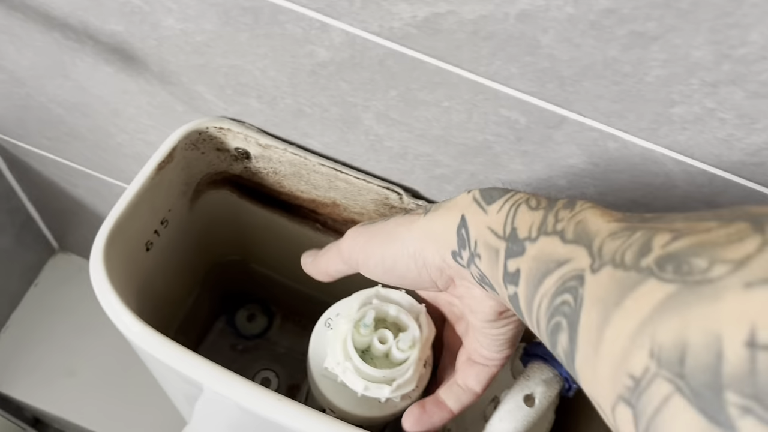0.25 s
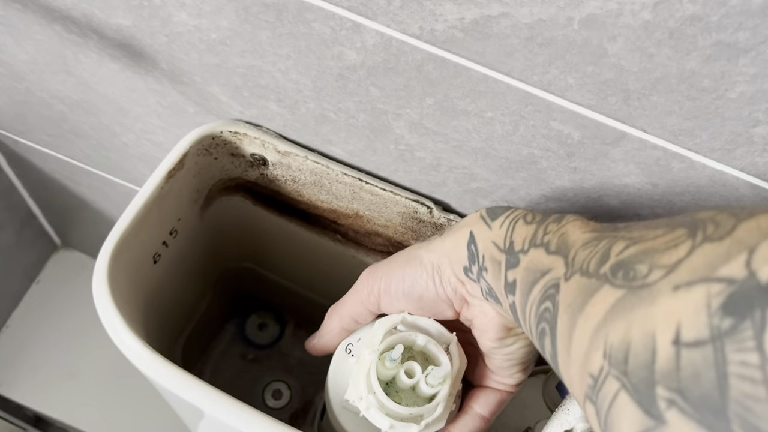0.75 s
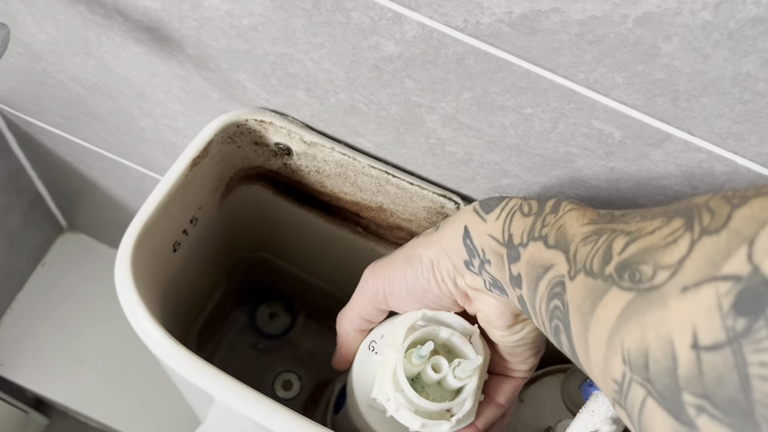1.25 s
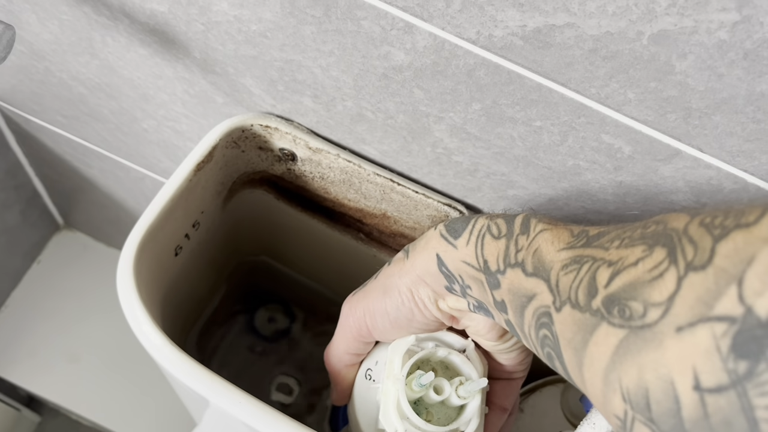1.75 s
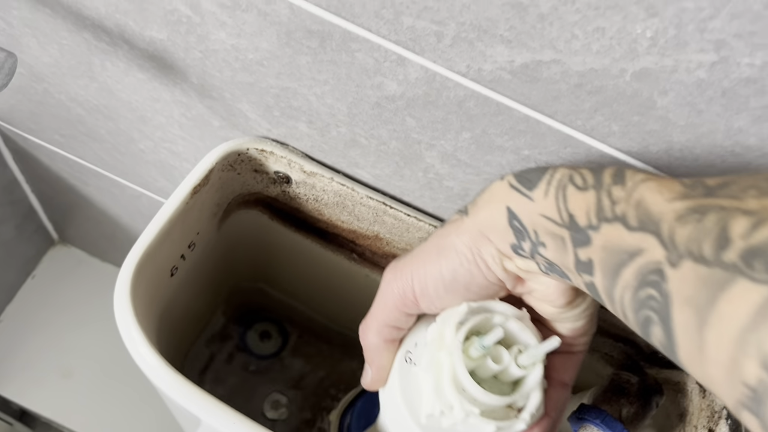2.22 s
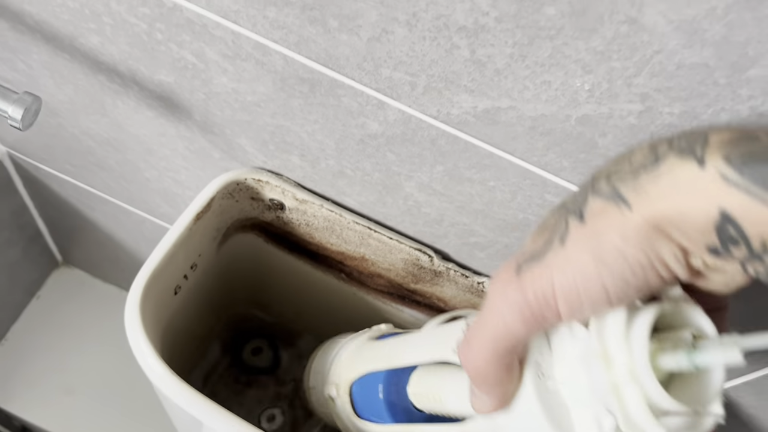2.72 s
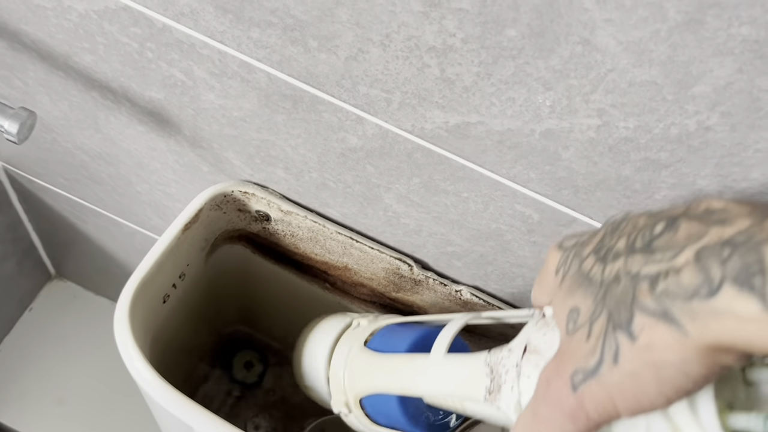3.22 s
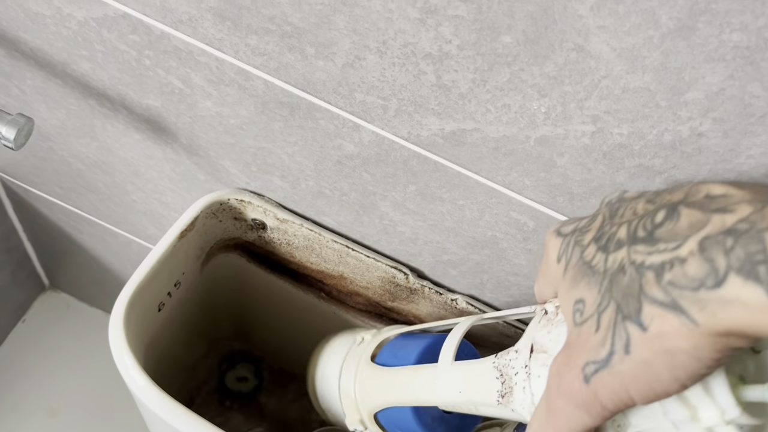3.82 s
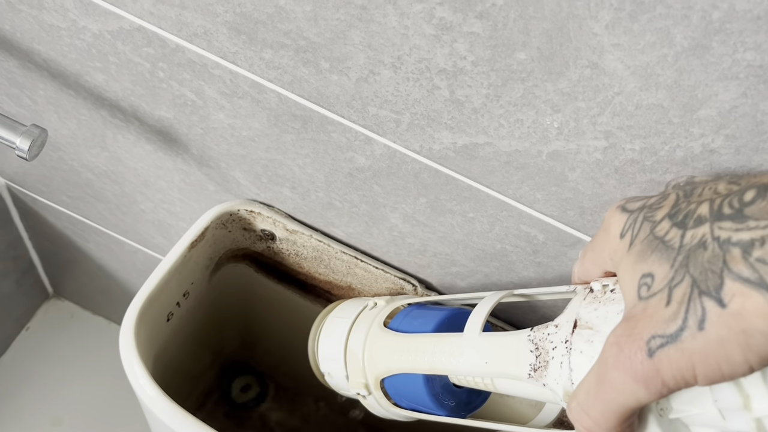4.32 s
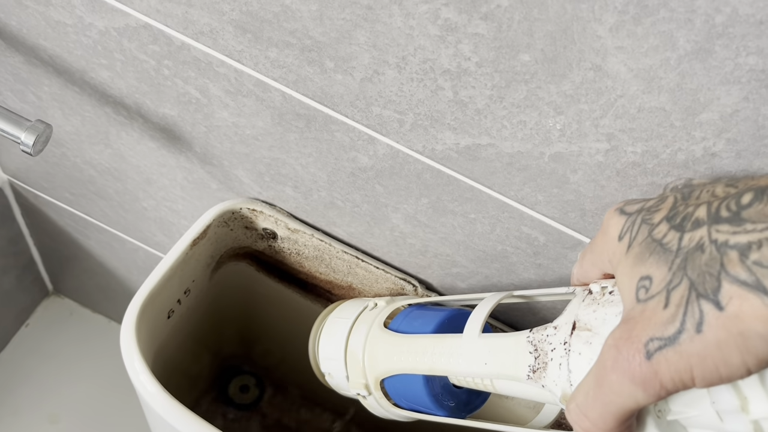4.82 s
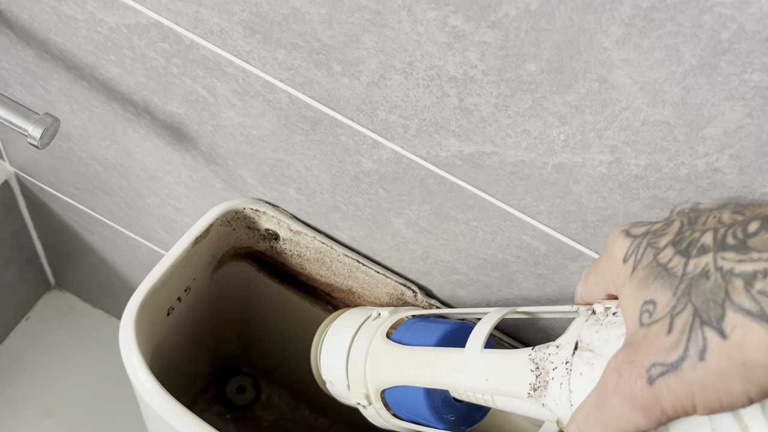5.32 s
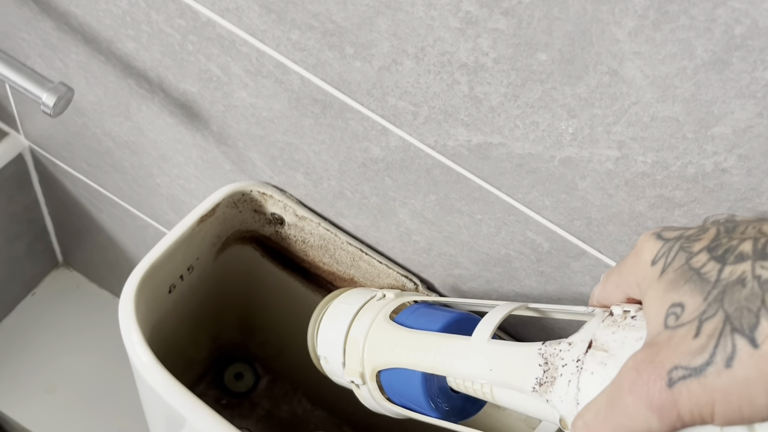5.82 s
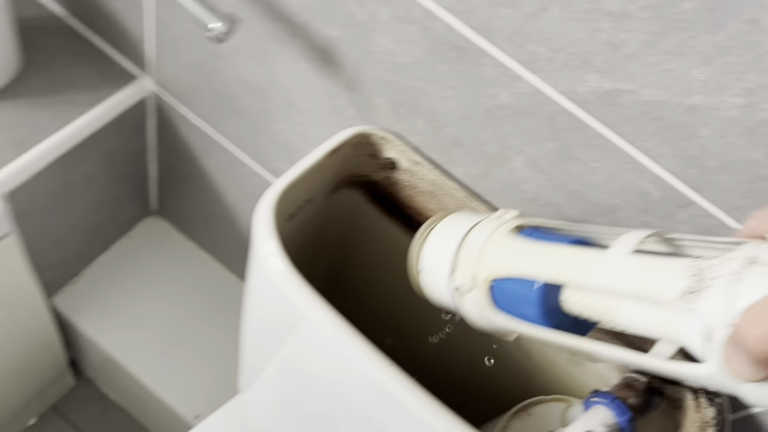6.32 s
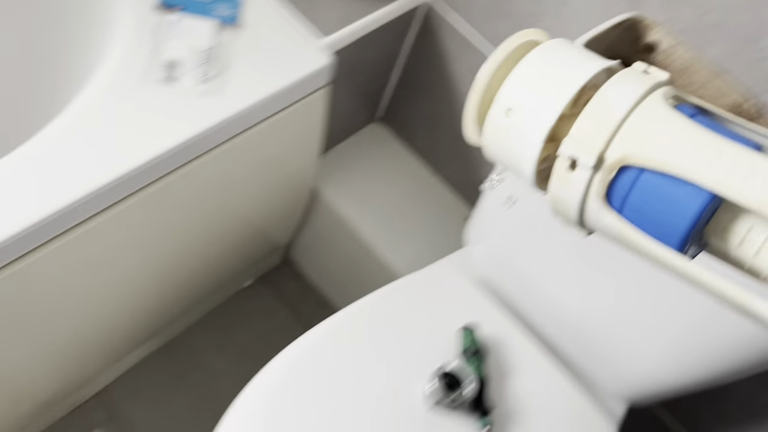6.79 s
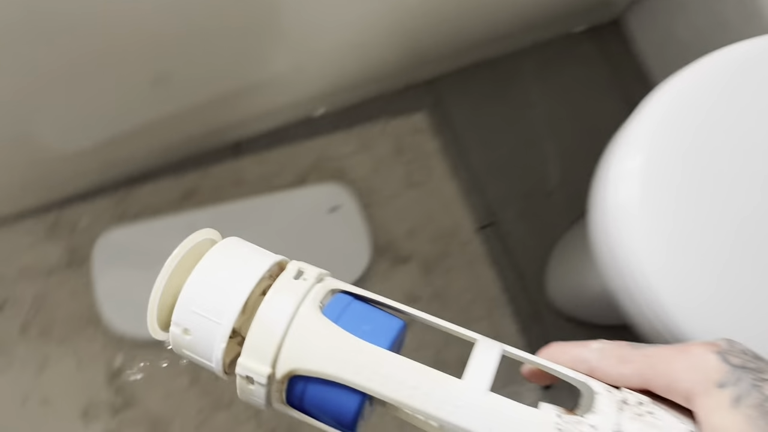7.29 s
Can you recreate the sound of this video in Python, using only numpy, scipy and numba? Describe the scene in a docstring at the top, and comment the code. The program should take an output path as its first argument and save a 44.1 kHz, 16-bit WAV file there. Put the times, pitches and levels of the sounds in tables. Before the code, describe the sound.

A hand rubs a plastic valve, then it clacks loose with a hollow thud and water gulps, rushes away and dwindles to drips in a tiled bathroom.

```python
"""In a small tiled bathroom, a hand twists the flush valve out of an open ceramic cistern under a held phone.
Skin and cloth rub as filtered noise; the valve clacks and rattles as bursts of tiny contacts ring its modes.
The last water gulps as fading sines and rushes away as swarms of bubbles and noise, dwindling to a trickle.
The outlet pipe hums as narrow noise, and drops from the valve make a smack, a bubble note and a splatter.
Noise echoes answer from the walls; the phone's two microphone ports differ in level and phase."""
import sys
import numpy as np
from scipy import signal
from scipy.fft import rfft, irfft, next_fast_len
from scipy.io import wavfile
from scipy.ndimage import uniform_filter1d
from numba import njit

SR = 44100
rng = np.random.default_rng(int(sys.argv[2]) if len(sys.argv) > 2 else 0)


def transcribe(signal):
    """Save signal, clipped to [-1, 1], as a 16-bit WAV file at the path in sys.argv[1]."""
    frames = np.atleast_2d(signal).T
    limited = np.clip(frames, -1, 1)
    pcm = np.round(limited * 32767).astype(np.int16)
    wavfile.write(sys.argv[1], SR, pcm)


N = 332955

# water leaving the cistern, before random wavering: [t/s, level/dB]
WATER_FLOW = [(1.93, -71), (2.02, -51), (2.08, -39.5), (2.42, -42), (2.56, -46.5), (2.7, -44.5),
              (2.96, -35.5), (3.4, -33.5), (3.57, -33), (3.73, -29.5), (3.9, -40), (4.56, -38.5),
              (4.81, -45.5), (5.0, -44), (5.5, -49), (5.65, -57), (6.2, -58.5), (6.45, -72.5), (6.7, -61),
              (7.0, -66), (7.3, -62), (7.55, -60)]
# tone colour of fine spray, also used for rubbing: [f/Hz, gain/dB]
SPRAY_COLOUR = [(300, -33), (1500, 0.5), (3000, -10.5), (5500, -11), (7000, -10.5), (10000, -16),
                (14000, -10), (17000, -29.5)]


def undb(db):
    """Turn decibels into a plain gain."""
    return 10 ** (np.asarray(db) / 20)


def level(x, db):
    """Scale a sound to an rms level in dB."""
    return x * undb(db) / np.sqrt(np.mean(x ** 2))


def track(table, outside=-120):
    """Draw each table column as a line over all samples, with a fixed value outside the table's times."""
    s, *columns = np.transpose(table)
    t = np.arange(N) / SR
    return [np.interp(t, s, column, left=outside, right=outside) for column in columns]


def coloured(x, points):
    """Change the tone by gains in dB, joined by straight lines over log frequency."""
    hz, db = np.transpose(points)
    size = next_fast_len(N)
    f = np.maximum(np.fft.rfftfreq(size, 1 / SR), 1)
    gain = undb(np.interp(np.log(f), np.log(hz), db))
    return irfft(rfft(x, size) * gain, size)[..., :N]


@njit
def svf(x, hz, width):
    """Let through a band around a centre that may move; the gain at the centre is 1."""
    y, b, l = np.empty(len(x)), 0., 0.
    for i in range(len(x)):
        g, k = np.tan(np.pi * hz[i] / SR), width / hz[i]
        v = (b + g * (x[i] - l)) / (1 + g * (g + k))
        b, l, y[i] = 2 * v - b, l + 2 * g * v, k * v
    return y


def band(x, hz, width):
    """Let through a band around a fixed centre."""
    return svf(x, np.full(len(x), min(1. * hz, .45 * SR)), max(1. * width, 5.))


def twice(x, hz, width):
    """Apply the same band filter twice, for steeper sides."""
    return band(band(x, hz, width), hz, width)


def walk(rate):
    """Make a smooth random wander around zero that heads somewhere new about rate times per second."""
    k = int(SR / rate)
    steps = np.repeat(rng.standard_normal(N // k + 1), k)
    return 0.99 * uniform_filter1d(uniform_filter1d(steps, k), k)[:N]


def add(out, s, sound, peak_db, pan_db):
    """Lay a sound into the stereo track at a peak level; pan_db is left minus right."""
    i = int(s * SR)
    n = min(len(sound), N - i)
    sides_db = peak_db + np.array([[pan_db], [-pan_db]]) / 2
    out[:, i:i + n] += sound[:n] / np.abs(sound).max() * undb(sides_db)


def ring(t, hz, t60_s, rise_s, glide):
    """Swell a sine to its crest, then let it fade while its pitch slides by the share glide."""
    since = t - rise_s
    bend = since + glide * (t - t60_s / 4 * (1 - np.exp(-4 * t / t60_s)))
    swell = np.sin(np.pi / 2 * np.minimum(t / rise_s, 1)) ** 2
    fade = 1000 ** (-np.maximum(since, 0) / t60_s)
    return np.cos(2 * np.pi * hz * bend) * swell * fade


def strokes(table, attack_s, sag_db_s, fade_db_s):
    """Gain of movements that each swell, change slowly while they last and then fade."""
    t = np.arange(N) / SR
    gain = 0
    for s, db, length_s in table:
        sag_db = sag_db_s * np.maximum(t - s, 0)
        fade_db = fade_db_s * np.maximum(t - s - attack_s - length_s, 0)
        # a stroke at time 0 is already under way
        swell = np.clip((t - s) / attack_s + (s == 0), 0, 1) ** 2
        gain = gain + undb(db - sag_db - fade_db) * swell
    return gain


def rubbing():
    """Skin and cloth rub on the plastic as coloured noise; a narrow moving band of it is the skin's squeak."""
    # hand and sleeve rubbing: [t/s, level/dB, length/s]
    rubs = [(0, -69, 0.17), (.17, -65, 0.21), (.315, -56.5, 0.39), (.995, -71.5, 0.042)]
    # bands that stand out in the rubbing: [f/Hz, width/Hz, gain/dB]
    rub_rings = [(330, 75, 16), (1620, 54, -5), (7100, 2700, -10)]
    # skin squeaking on the plastic, before wavering: [t/s, level/dB, length/s]
    squeaks = [(.325, -67.5, 0.12), (.48, -74, 0.1), (.6, -87, 0.085)]
    shape = dict(attack_s=0.031, sag_db_s=44.5, fade_db_s=246)
    noise = rng.standard_normal(N)
    rub = coloured(noise, SPRAY_COLOUR) + sum(undb(db) * band(noise, hz, w) for hz, w, db in rub_rings)
    squeak_hz = 2660 * (1 + 0.013 * walk(19))
    squeak = level(svf(noise, squeak_hz, 130.0), 0) * undb(2.6 * walk(40.2))
    return level(rub, 0) * strokes(rubs, **shape) + squeak * strokes(squeaks, **shape)


def rumble():
    """Moving air, hand movement and the drain are deep noise that reaches both ports alike."""
    # air and hand movement at the phone: [t/s, level/dB, length/s]
    thumps = [(0, -63.5, 0.15), (.2, -61.5, 0.23), (.86, -67, 0.071), (1.57, -38.5, 0.051),
              (1.94, -38.5, 0.18), (2.08, -40, 0.045), (2.62, -32.5, 0.06), (2.89, -50, 0.024),
              (3.74, -57, 0.016), (5.65, -57, 0.61), (6.3, -52.5, 0.35), (6.71, -43.5, 0.027),
              (6.855, -35.5, 0.01), (6.91, -45, 0.012), (7.1, -53.5, 0.58), (7.44, -53, .1)]
    deep = band(twice(rng.standard_normal(N), 53, 170.0), 58, 200.0)
    # the drain follows the rush 13 dB below it, and wavers
    drain = undb(track(WATER_FLOW)[0] - 13 + 3 * walk(6.8))
    # the negative sag lets a thump grow slightly while it lasts
    movement = strokes(thumps, attack_s=0.033, sag_db_s=-1.5, fade_db_s=122.5)
    return level(deep, 0) * (movement + drain)


def still_room():
    """The quiet room is steady coloured noise."""
    # tone colour of the quiet: [f/Hz, gain/dB]
    quiet_colour = [(35, -32.5), (60, -6.5), (96, 1.5), (566, -12), (862, -11.5), (946, -10.5), (3580, -30),
                    (16000, -29.5)]
    return level(coloured(rng.standard_normal(N), quiet_colour), -74.5)


def gulps():
    """Gulps of air and a few soft thumps ring as low fading sines, often with a sliding pitch."""
    # gulps and soft thumps, glide below zero falls: [t/s, peak level/dB, f/Hz, rise/ms, glide/share of f]
    gulp_list = [(0.363, -48, 314, 12.6, 0.05), (1.975, -35, 298.5, 8.1, 0.05), (2.02, -29, 425, 17, 0.03),
                 (2.074, -31.5, 292, 18, 0.12), (2.12, -6, 212.8, 13.6, -0.012),
                 (2.17, -35, 790, 12, -0.0025), (2.33, -30.5, 560, 18, .25),
                 (2.318, -23, 309.3, 10, 0.0041), (2.365, -14, 184, 5.1, 0.18), (2.366, -12.5, 683, 4, 0.2),
                 (2.626, -27, 216.6, 8.5, 0.049), (2.65, -30.5, 95, 15.9, -0.02),
                 (2.674, -28.5, 470, 11, -0.021), (2.707, -24, 208.2, 7.3, -0.029),
                 (2.879, -32.5, 98.8, 18.7, -0.032), (3.053, -35, 211, 6.5, 0.0014),
                 (3.389, -19.5, 209, 15.5, 0.036), (3.698, -30.5, 243, 12, 0.13),
                 (4.369, -35.5, 199.6, 31.7, 0.049), (4.667, -37.5, 207, 23.4, -0.013),
                 (5.146, -29.5, 214.4, 3.7, 0.047), (5.211, -39.5, 413, 8, 0.044),
                 (5.25, -41, 421, 14, 0.04), (5.344, -29.5, 214.8, 8.7, -0.052),
                 (5.455, -32, 225, 5.4, 0.13), (5.675, -36.5, 227, 4.9, 0.15),
                 (5.677, -39, 421, 6.5, 0.085), (5.69, -45.5, 140.6, 7.3, 0.049),
                 (5.736, -50, 420, 8, 0.14), (5.78, -46, 312, 8.4, 0.061), (5.875, -43.5, 320, 8, 0.14),
                 (5.91, -51, 450, 8, 0.18), (6.006, -33, 333, 2.85, -0.084),
                 (6.031, -39.5, 424, 7.4, -0.048), (6.051, -30, 327, 6, -0.031),
                 (6.092, -21.5, 223, 21.9, 0.156), (6.086, -32.5, 416, 8, 0.16),
                 (6.151, -46, 431, 8, -0.093), (6.15, -37, 248, 34, -0.0017),
                 (6.109, -40.5, 149.4, 21.4, -0.024), (6.205, -45, 412, 8, 0.07),
                 (6.335, -51, 515, 12, 0.081), (6.385, -54, 600, 8, .12), (6.43, -49, 650, 6, .05),
                 (6.54, -51, 400, 6.6, 0.12), (6.439, -26.5, 231, 22, 0.086),
                 (6.499, -38.5, 252, 23, 0.014), (6.523, -45, 155.3, 62, -0.0073),
                 (6.864, -34, 90.5, 17, 0.32), (6.867, -46, 320, 4.1, 0.19), (6.945, -45, 211, 5.5, 0.031),
                 (7.413, -38.5, 286, 4, 0.27)]
    out, t = np.zeros((2, N)), np.arange(int(.9 * SR)) / SR
    for s, db, hz, ms, glide in gulp_list:
        # rising and loud ones die sooner than the basic 93 cycles to 60 dB down
        loss = 1 + 12 * max(glide, 0) + 0.5 * undb(db)
        add(out, s, ring(t, hz, 93 / hz / loss, ms / 1000, glide), db, 0)
    return out


def tank_thuds():
    """Blows on the ceramic tank ring its modes; harder blows reach more of the upper ones."""
    # thuds: [t/s, peak level/dB, rise of the main and lower modes/ms, hardness/dB per octave]
    thuds = [(1.549, -10, 6.8, -5.5), (1.58, -19, 6.3, -7), (1.603, -23, 7.2, -27), (2.124, -5.5, 9.1, -27),
             (5.358, -30, 12, -9.5)]
    # modes of the tank: [f/Hz, strength before hardness/dB, fade by 60 dB/s]
    tank = [(100.2, -25, 1), (167.9, -2.5, 0.32), (172.6, -16, 0.7), (325.5, 7.5, 0.063),
            (314, -21.5, 0.66), (640, -14, 0.14), (790, -18.5, .2)]
    out, t = np.zeros((2, N)), np.arange(int(.9 * SR)) / SR
    main_hz = tank[1][0]
    for s, db, ms, hard_db in thuds:
        modes = 0
        for hz, mode_db, t60_s in tank:
            octaves = max(np.log2(hz / main_hz), 0)
            # upper modes speak sooner
            rise_s = ms / 1000 * min(main_hz / hz, 1)
            modes = modes + undb(mode_db + hard_db * octaves) * ring(t, hz, t60_s, rise_s, 0)
        add(out, s, modes, db, 0)
    return out


def knocks():
    """A quick run of tiny contacts rings the valve's modes and one chosen note, with a crack and a thud."""
    # plastic knocks and a few splashes of water; crack and thud are rms levels beside a body near 0 dB:
    # [t/s, peak level/dB, chosen note f/Hz, crack level/dB, thud level/dB, rattle fade/ms]
    knock_list = [(0.847, -51, 3760, 6, 2, 13), (0.878, -45.5, 1050, -24, 5, 18),
                  (1.017, -59.5, 2700, 4, -14, 35), (1.16, -69, 7000, 7, -30, 6),
                  (1.238, -72, 5970, 0, -30, 6), (1.272, -46, 1620, -4, -32.5, 10),
                  (1.277, -52.5, 1160, -26.5, -13.5, 16), (1.375, -61, 1640, -27, -17.5, 5.6),
                  (1.538, -18.5, 1100, -10, -2, 8.8), (1.544, -6.5, 2740, -12, -12.5, 14),
                  (1.549, -6.5, 1534, -30, -15.5, 8.3), (1.552, -4.5, 3000, 2.5, 3, 18),
                  (1.579, -5.5, 5050, 1, -19, 4.3), (1.745, -45.5, 2347, -26, -26.5, 10),
                  (1.987, -37, 2700, -38, -15, 21), (2.019, -29, 2640, -36, -25, 7.9),
                  (2.023, -26.5, 1140, -40, -25, 15), (2.032, -18.5, 2730, -43, -20, 6.2),
                  (2.035, -31.5, 3330, -44, -9, 9.4), (2.043, -26.5, 1110, -46, -10, 32),
                  (2.124, -39, 1100, -30, -5.5, 9.5), (2.135, -27.5, 4740, -9.5, -5, 18),
                  (2.14, -29.5, 1360, -24, -9, 54), (2.27, -35, 4500, -19, -15, 32),
                  (2.283, -25.5, 2690, -5, -12, 15), (2.365, -21, 800, -19, -23, 7.5),
                  (2.373, -18.5, 2690, -14, -20, 13), (2.643, -29, 600, -24, 21, 12),
                  (2.674, -23, 3780, -18, -13, 10), (2.874, -22, 2380, -32, -18, 14),
                  (3.052, -18, 537, -1, 0, 9), (3.074, -13.5, 2800, -20, 4.5, 3.4),
                  (3.145, -18, 2720, -35, -24, 12), (3.203, -19, 2900, -37, -16, 2.9),
                  (3.228, -16, 1300, -4, -34, 21), (3.253, -7, 1460, -26, -8, 9),
                  (3.403, -13, 3370, -2.5, -42, 36), (3.432, -7.5, 2590, -13, -2.5, 5.05),
                  (3.543, -18.5, 1450, -9, -27, 6.2), (3.579, -13.5, 1810, 0.5, -28, 24),
                  (3.596, -13.5, 1340, -12, -39, 10), (3.605, -5.5, 2570, -28, -32, 7.5),
                  (3.608, -10.5, 1330, -32, -6, 3.3), (3.672, -19.5, 2410, -33, -35, 19),
                  (3.706, -15, 1430, -33, -37, 18), (3.752, -13.5, 1310, -4, -28, 12),
                  (3.779, -6, 910, -34, -30, 3.8), (3.777, -9.5, 2570, -19, -6.5, 5.3),
                  (3.839, -16, 1780, -10, -35, 8.3), (3.886, -23, 4150, -38, -28, 9.3),
                  (4.396, -28, 3770, -25, -23, 5.2), (4.426, -28, 2600, -25, -23, 3.8),
                  (4.656, -16.5, 2820, -30, -11, 3.7), (4.793, -32, 1110, -29, -21, 4.7),
                  (5.582, -33.5, 1620, -1, -12, 32), (5.686, -35.5, 1350, -1, -1, 6.1),
                  (6.023, -35, 1320, -21, -22, 11), (7.05, -45, 4200, -4, -27, 31),
                  (7.285, -46, 5250, -7, -22, 18)]
    # modes of the valve, before random change: [f/Hz, width/Hz, strength/dB]
    valve = [(870, 200, 0), (1110, 110, 2.5), (1390, 190, -3), (1640, 75, 5), (2137, 180, -6.5),
             (2730, 120, -6.5), (3155, 110, -4), (3390, 110, -5.5), (3730, 200, -11.5), (4800, 710, -3.5),
             (7700, 600, -32.5)]
    # each knock starts this long before its listed time; random left-right difference
    lead_s, spread_db = 0.0022, 3.5
    out, t = np.zeros((2, N)), np.arange(int(.1 * SR)) / SR
    for s, db, hz, crack_db, thud_db, ms in knock_list:
        chance = rng.standard_normal((2, len(t)))
        rise_ms = min(5.05, 0.77 * ms)  # short knocks are sharp
        swell = np.minimum(t * 1000 / rise_ms, 1) ** 1.9
        force = swell * np.exp(-np.maximum(t * 1000 - rise_ms, 0) / ms)
        contacts = chance[0] * np.abs(chance[1]) ** 1.14 * force
        body = 0
        for f, w, mode_db in valve:
            gain = undb(mode_db + 2.4 * rng.standard_normal()) / np.sqrt(w)
            body = body + gain * band(contacts, f, w)
        note = band(band(contacts, hz, 0.37 * hz), hz, 0.2 * hz)
        clatter = band(band(contacts, 2070, 1800.0), 2330, 1900.0)
        # the crack of first contact fades on top of the rattle's own fade
        crack = twice(contacts * np.exp(-t / 0.0031), 5800, 8000.0)
        thud = twice(contacts, 450, 490.0)
        sound = level(body, -0.079) + level(note, 0.22) + level(clatter, -2.2)
        sound = sound + level(crack, crack_db) + level(thud, thud_db)
        add(out, s - lead_s, sound, db, spread_db * rng.standard_normal())
    return out


@njit
def bubbles(start, hz, cycles, size, glide, length):
    """Each bubble is a fading sine whose pitch rises as it nears the surface."""
    out = np.zeros(length)
    for j in range(len(start)):
        tau, phase = cycles[j] * SR / hz[j], 0.
        for i in range(min(int(5 * tau), length - start[j])):
            phase += 2 * np.pi * hz[j] * (1 + glide * i / tau) / SR
            out[start[j] + i] += size[j] * np.sin(phase) * (np.exp(-i / tau) - np.exp(-8 * i / tau))
    return out


def swarm(count, lo_hz, hi_hz, cycles, scatter_db, glide=0.043):
    """Bubbles start at random moments and pitches, a few much louder than the rest."""
    when, pitch, loudness, life = rng.random((count, 4)).T
    start = (when * N).astype(np.int64)
    hz = lo_hz * (hi_hz / lo_hz) ** pitch
    size = undb(-scatter_db * np.log(1 - 0.99 * loudness))
    return level(bubbles(start, hz, cycles * (.5 + life), size, glide, N), 0)


def splashes():
    """Separate splashes over an even flow: sudden, soon gone, a few much larger."""
    hits = (rng.random(N) < 72 / SR) * rng.exponential(size=N)  # about 72 per second
    fade = np.exp(-1 / (0.0073 * SR))
    splash = signal.lfilter([1], [1, -fade], uniform_filter1d(hits, size=60))
    return level(1.5 + level(splash, -5.5), 0)


def rush():
    """Bubbles and churning noise ring the hollow air of the cistern, with plops of larger bubbles."""
    # air of the cistern, before wandering and widening: [f/Hz, width/Hz, strength/dB]
    bowl = [(577, 73, -10), (749, 72, -8.5), (1007, 59, -0.5), (1142, 110, -3), (1271, 160, -5.5),
            (1410, 145, -1.5), (1593, 100, 1.5), (1756, 14, -30.5), (2460, 330, -9), (3710, 510, -7.5)]
    # tone colour of the open rush: [f/Hz, gain/dB]
    rush_colour = [(30, -68), (150, -24), (300, -23), (450, -9), (700, -1), (1500, 10), (2200, -3.5),
                   (4000, 5.5), (16000, -30.5)]
    churn = swarm(count=9000, lo_hz=400.0, hi_hz=3400, cycles=2.63, scatter_db=1.5)
    churn = churn + 0.36 * level(band(rng.standard_normal(N), 1300, 2500.0), 0)
    hollow = 0
    for hz, w, db in bowl:
        # the air pockets change shape, so their notes wander
        pocket_hz, width_hz = hz * (1 + 0.041 * walk(12)), 1.26 * w
        pocket = svf(svf(churn, pocket_hz, width_hz), pocket_hz, width_hz)
        hollow = hollow + undb(db + 8.2 * walk(18)) * pocket
    plops = swarm(count=4200, lo_hz=560.0, hi_hz=2600, cycles=6.7, scatter_db=2.0, glide=0.045)
    return level(level(hollow, 0) + level(coloured(churn, rush_colour), -0.75) + level(plops, -4.8), 0)


def spray():
    """Fine spray is noise and tiny bubbles in uneven lumps, with brief treble flecks."""
    mist = rng.standard_normal(N)
    mist = mist + 0.41 * swarm(count=4000, lo_hz=2583, hi_hz=15570, cycles=6.2, scatter_db=3.0)
    # each pitch range has its own lumps
    centres_hz = 1000 * 2 ** np.arange(0, 4.1, .5)
    lumps = sum(undb(3.3 * walk(28)) * band(mist, hz, 0.62 * hz) for hz in centres_hz)
    # about 9 flecks per second burst close by, each with a short fizz
    flecks = (rng.random(N) < 9 / SR) * undb(2.9 * rng.standard_normal(N))
    fizz = signal.lfilter([1], [1, -np.exp(-1 / (0.0033 * SR))], flecks) * rng.standard_normal(N)
    return level(coloured(lumps, SPRAY_COLOUR), 0) + level(twice(fizz, 11300, 7000.), -11.5)


def water():
    """Rush, gurgle and spray follow the outflow; splashes shake the rush and spray, and all surge together."""
    # fine spray of the water, before wavering: [t/s, level/dB]
    spraying = [(1.93, -64.5), (2.03, -51.5), (2.25, -55.5), (2.4, -45.5), (2.6, -47.5), (2.72, -39),
                (2.85, -38.5), (3.1, -33), (3.6, -38.5), (3.95, -42), (5.3, -45), (5.7, -58.5),
                (6.2, -59.5), (6.48, -62), (6.75, -61.5), (7.02, -59), (7.28, -55), (7.55, -51)]
    # large bubbles in the water, before wavering: [t/s, level/dB]
    gurgling = [(1.93, -70.5), (2.08, -41.5), (2.5, -44.5), (2.68, -39.5), (3.5, -45.5), (4.1, -54),
                (4.9, -63), (5.3, -58.5), (5.7, -65.5), (6.08, -57), (6.4, -62), (7.05, -70), (7.55, -56)]
    (rush_db,), (spray_db,), (gurgle_db,) = track(WATER_FLOW), track(spraying), track(gurgling)
    splash = splashes()
    gurgle = swarm(count=2600, lo_hz=291.5, hi_hz=953, cycles=2.9, scatter_db=2.6, glide=0.09)
    mix = np.sqrt(splash) * rush() * undb(rush_db)
    mix = mix + gurgle * undb(gurgle_db + 2 * walk(8.4))
    mix = mix + splash * spray() * undb(spray_db + 2.3 * walk(30))
    return mix * undb(0.5 * walk(9.1))


def outlet():
    """Turbulence keeps the air column of the pipe humming: noise through a narrow moving band."""
    # air column of the outlet pipe, level before wavering: [t/s, f/Hz, level/dB]
    pipe = [(2.15, 204, -52), (2.27, 199, -30), (2.56, 202, -39.5), (2.7, 192.6, -32.5), (3.2, 222, -34),
            (3.9, 212, -44.5), (4.06, 209, -43), (4.5, 201, -49), (5.1, 213, -47.5), (5.7, 242, -53.5),
            (6.6, 242, -65), (7.55, 217, -59.5)]
    hz, db = track(pipe)
    hz = np.clip(hz, 150, 300)  # keeps a valid pitch outside the table, where the hum is silent
    hum = svf(svf(rng.standard_normal(N), hz, 43.0), hz, 43.0)
    return level(hum, 0) * undb(db + 1.3 * walk(3.9))


def drops():
    """A drop gives a wet smack, the ring of a trapped bubble, and a splatter fluttering near the same note."""
    # drops falling from the valve: [t/s, peak level/dB, bubble f/Hz, splatter length/ms]
    drop_list = [(2.544, -36, 460, 22), (2.679, -24, 578, 11), (2.708, -27, 1590, 5.5),
                 (2.739, -29, 1620, 8.6), (2.801, -25, 618, 11), (2.816, -28, 1600, 4.8),
                 (2.846, -29, 1620, 26), (2.895, -26.5, 1600, 9.3), (2.914, -34, 950, 18),
                 (2.963, -22.5, 1528, 33), (3.13, -21.5, 1424, 25), (3.333, -28, 1460, 11),
                 (3.361, -28, 1500, 11), (3.984, -27, 1430, 11.4), (4.03, -24, 1586, 37),
                 (4.104, -31.5, 723, 26), (4.105, -28, 1510, 12), (4.168, -33, 732, 18),
                 (4.174, -29.5, 2090, 35), (4.263, -29, 1554, 15), (4.342, -35.5, 1494, 53),
                 (4.471, -31, 1450, 13), (4.501, -27, 2650, 7.1), (4.642, -31.5, 1424, 9.1),
                 (4.733, -27, 1460, 8.2), (4.842, -32.5, 1620, 14), (4.966, -35, 2110, 6.7),
                 (4.98, -38, 3320, 27), (5.21, -41, 2800, 20), (5.302, -35.5, 3210, 5.4),
                 (5.051, -28.5, 1390, 13.5), (5.144, -24, 1154, 12), (5.214, -33.5, 1510, 10),
                 (5.284, -32.5, 1500, 25), (5.326, -45, 2180, 10), (5.369, -41, 1410, 68),
                 (5.415, -40, 1600, 21), (5.77, -39, 2120, 14), (5.855, -40, 1460, 9.5),
                 (5.967, -40.5, 1525, 13), (5.99, -48, 1170, 10), (6.035, -36, 1794, 9.3),
                 (6.073, -29.5, 1170, 7.3), (6.196, -47, 3480, 15), (6.225, -51, 4440, 8.5),
                 (6.226, -44.5, 1620, 17), (6.28, -49, 2870, 11), (6.551, -53, 1217, 16),
                 (6.598, -42.5, 1117, 8.7), (6.646, -49, 1600, 14), (6.652, -49, 1190, 26),
                 (6.72, -56, 1150, 22), (6.724, -51, 3400, 10), (6.728, -49, 2810, 33),
                 (6.8, -41.5, 1610, 31), (6.857, -54, 2000, 8), (7.052, -45, 560, 14),
                 (7.093, -48, 587, 14), (7.126, -45.5, 1490, 66), (7.196, -49, 1540, 20),
                 (7.199, -49, 3100, 15), (7.292, -40.5, 1244, 23), (7.296, -50, 760, 13),
                 (7.339, -38.5, 743, 12.5), (7.342, -41, 1600, 15), (7.397, -42.5, 760, 16),
                 (7.442, -43, 1620, 9.1), (7.469, -43, 634, 37), (7.514, -45, 1600, 30)]
    pan_db, spread_db = 1, 3  # drops fall left of the phone, with a random spread
    out, t = np.zeros((2, N)), np.arange(int(.15 * SR)) / SR
    for s, db, hz, ms in drop_list:
        chance = rng.standard_normal((2, len(t)))
        splash = chance[0] * np.minimum(t / 0.0032, 1) * np.exp(-t / 0.0085)
        smack = twice(splash, hz, 0.61 * hz)
        patter = chance[1] * np.minimum(t / 0.0025, 1) * np.exp(-(t * 1000 / ms) ** 3)
        flutter = svf(patter, hz * (1 + 0.41 * t), 0.04 * hz)
        # big, low bubbles ring longer
        bubble = ring(t, hz, 0.037 * np.sqrt(1000 / hz), 0.00294, 0.09)
        sound = undb(-0.5) * bubble + flutter / np.abs(flutter).max()
        sound = sound + undb(-8) * smack / np.abs(smack).max()
        add(out, s, sound, db, pan_db + spread_db * rng.standard_normal())
    return out


def bathroom(x, low):
    """Tiled walls answer with dense echoes: noise that fades band by band."""
    # echo bands, strength before evening out by pitch and fade: [f/Hz, fade by 60 dB/s, strength/dB]
    room = [(218, 0.38, -9.5), (720, 0.11, -12), (1600, 0.35, -13.5), (3700, 0.34, -9.5),
            (5900, 0.034, -13), (11400, 0.28, -1)]
    # echo that differs left to right: [f/Hz, gain/dB]
    room_wide = [(150, -26), (600, 1), (4000, 1), (8000, -0.5), (16000, -26)]
    t = np.arange(int(.6 * SR)) / SR
    answers = []
    for noise in rng.standard_normal((3, len(t))):
        echo = 0
        for hz, t60_s, db in room:
            fade = 1000 ** (-t / t60_s) / np.sqrt(hz * t60_s)
            echo = echo + undb(db) * band(noise, hz, 0.88 * hz) * fade
        answers.append(signal.fftconvolve(x, echo * np.minimum(t / 0.0013, 1))[:N])
    # two noise echoes are blended by a fast random turn, which smooths the tail
    turn = np.cumsum(130 * walk(14)) / SR  # wandering speed, in radians per second
    mid = np.cos(turn) * answers[0] + np.sin(turn) * answers[1]
    # low sounds use one steady echo, the last one made
    mid = mid + signal.fftconvolve(low, echo)[:N]
    side = coloured(np.cos(turn) * answers[2] + np.sin(turn) * answers[0], room_wide)
    return mid + side * np.array([[1], [-1]])


def scene():
    """Add the valve and water close by, their echoes, the hands and the still room."""
    near = knocks() + drops() + water()
    low = gulps() + tank_thuds() + outlet()
    # low sounds are sent only faintly into the echo, so the gulps stay clear
    echoes = bathroom(near.mean(axis=0), 0.14 * low[0])
    return near + low + echoes + rubbing() + rumble() + still_room()


def record(dry):
    """The two ports differ in level and phase with frequency; peaks are rounded and the top is cut."""
    # how far the left port leads: [f/Hz, phase/rad]
    port_lead = [(0, 0), (690, 1.1), (1810, -0.4), (3010, 0.9), (5080, -0.1), (5860, -2.3), (6720, -3.1),
                 (7150, -4.3), (8350, -6.1), (9820, -6.4), (11800, -9.1), (13700, -9.7), (15200, -12.4),
                 (16500, -12.6)]
    # left minus right: [f/Hz, level difference/dB]
    port_tilt = [(60, -4.5), (110, 1.5), (200, -0.5), (380, -1.5), (700, -0.5), (1290, 7.5), (2380, 0.5),
                 (4400, 7), (8120, -1.5), (15000, 0.5)]
    top_hz = 16300
    size = next_fast_len(N)
    f = np.fft.rfftfreq(size, 1 / SR)
    lead = np.interp(f, *np.transpose(port_lead))
    tilt_hz, tilt_points_db = np.transpose(port_tilt)
    tilt_db = np.interp(np.log(f + 1), np.log(tilt_hz), tilt_points_db)
    # the ports lose the deepest bass
    left, right = rfft(dry, size) * f ** 2 / (f ** 2 + 70.0 ** 2)
    left = left * undb(tilt_db / 2)
    right = right * undb(-tilt_db / 2) * np.exp(-1j * lead)
    ports = irfft([left, right], size)[:, :N]
    top_cut = signal.ellip(10, .2, 80, top_hz, fs=SR, output="sos")
    return signal.sosfilt(top_cut, np.tanh(ports))


dry = scene()
out = record(dry)
transcribe(out)
```